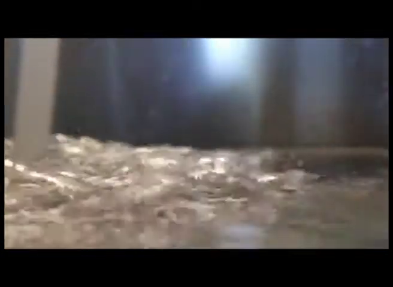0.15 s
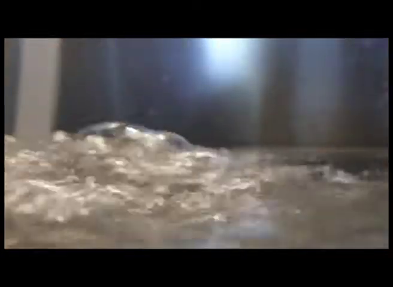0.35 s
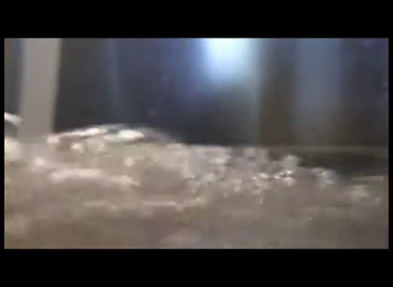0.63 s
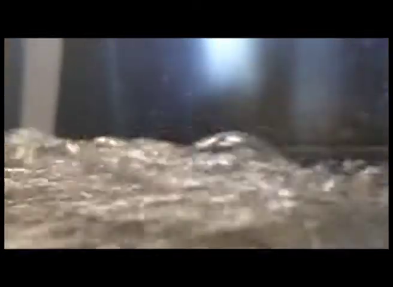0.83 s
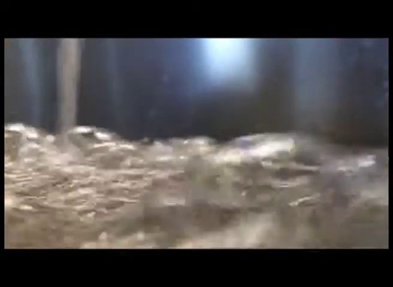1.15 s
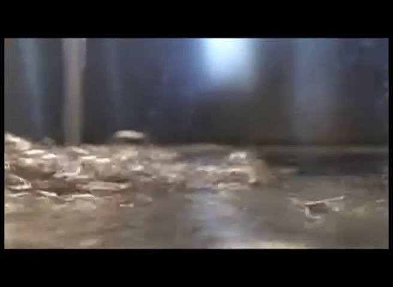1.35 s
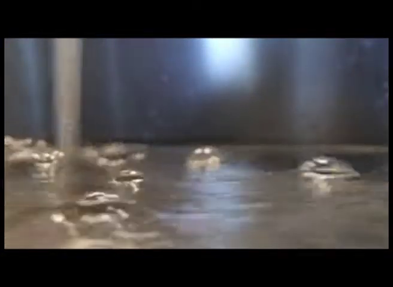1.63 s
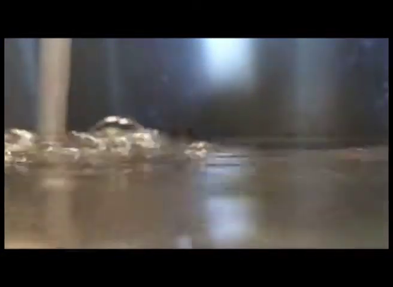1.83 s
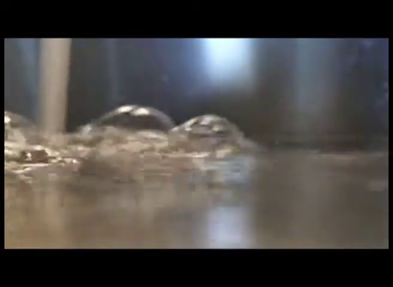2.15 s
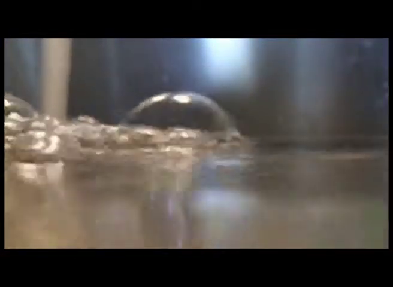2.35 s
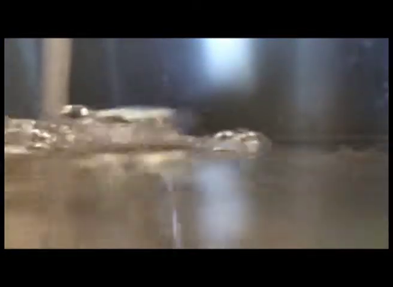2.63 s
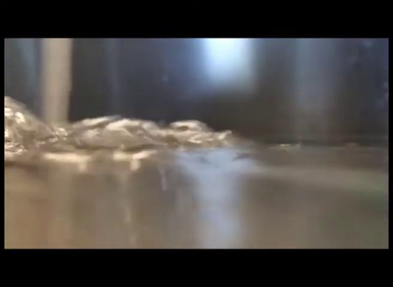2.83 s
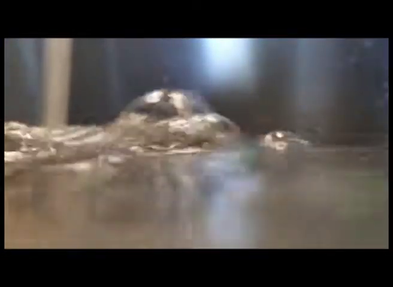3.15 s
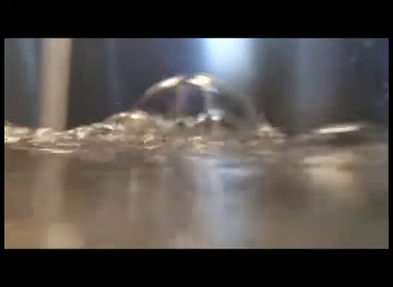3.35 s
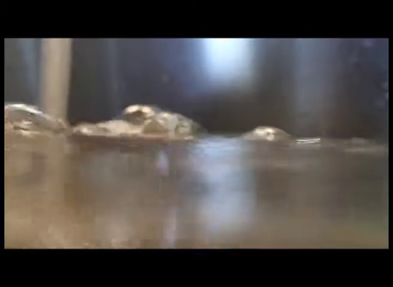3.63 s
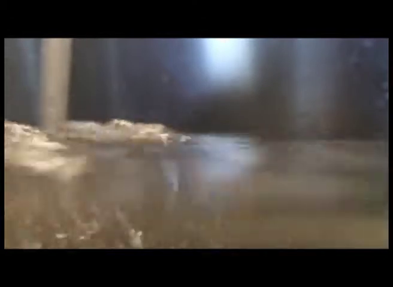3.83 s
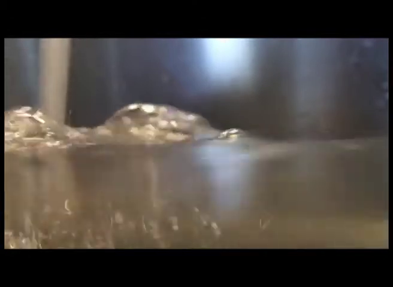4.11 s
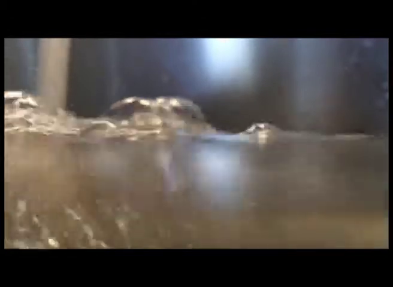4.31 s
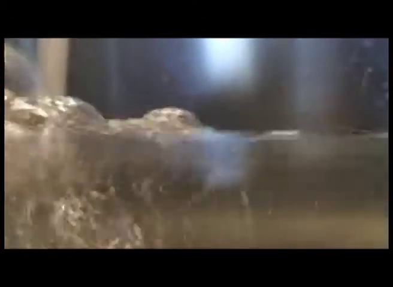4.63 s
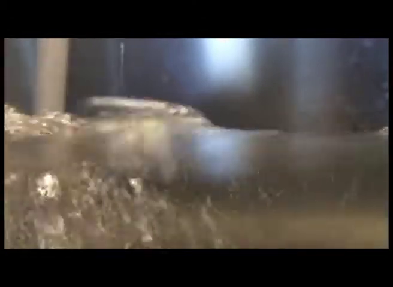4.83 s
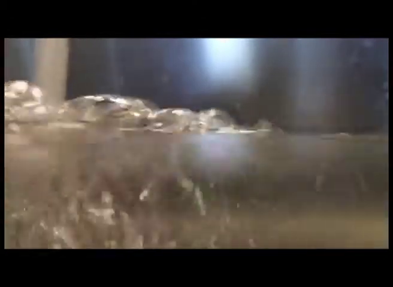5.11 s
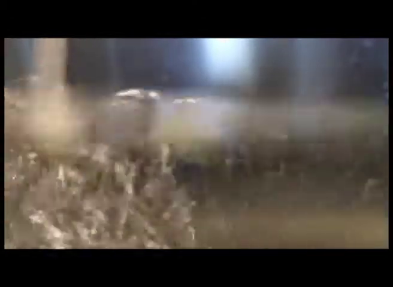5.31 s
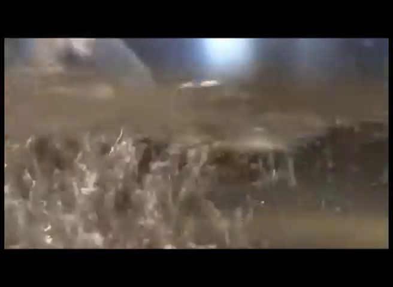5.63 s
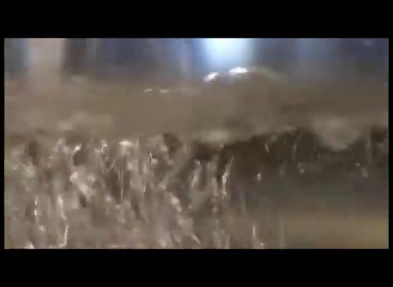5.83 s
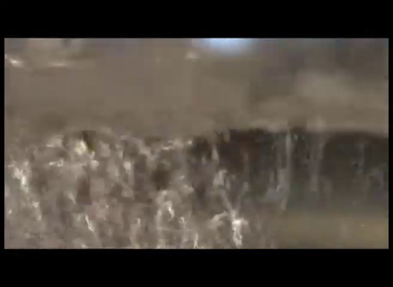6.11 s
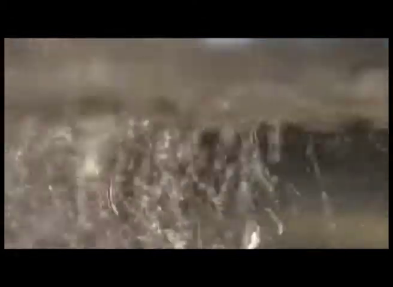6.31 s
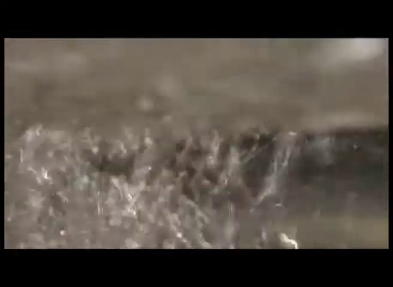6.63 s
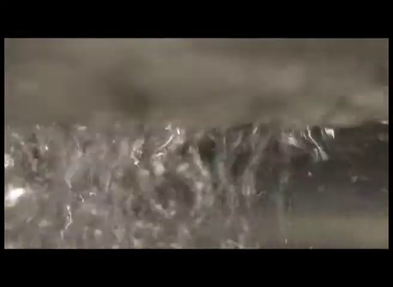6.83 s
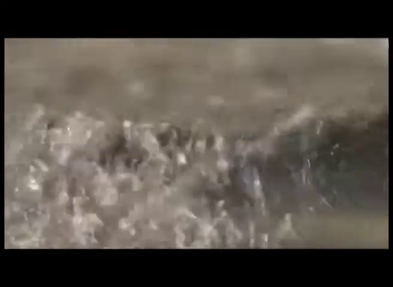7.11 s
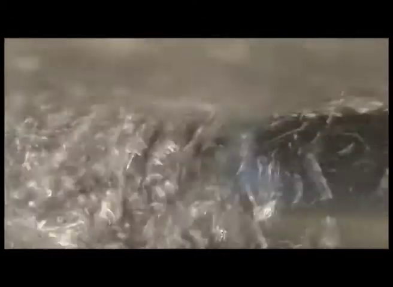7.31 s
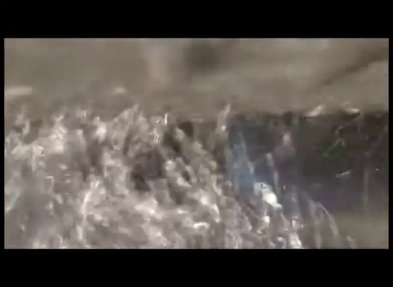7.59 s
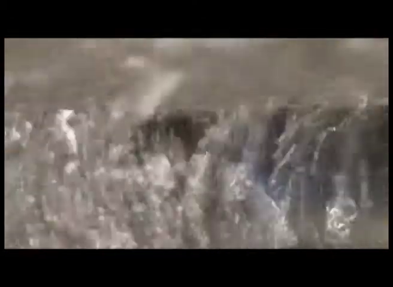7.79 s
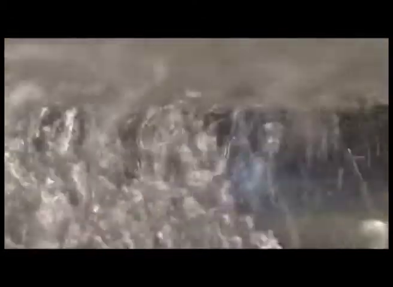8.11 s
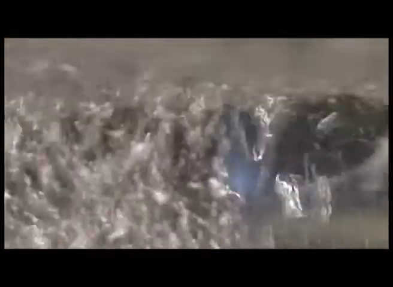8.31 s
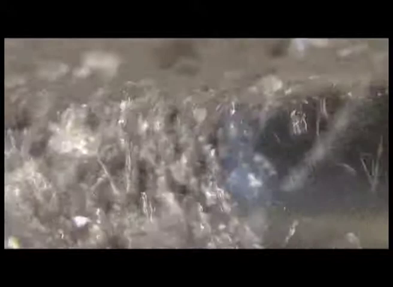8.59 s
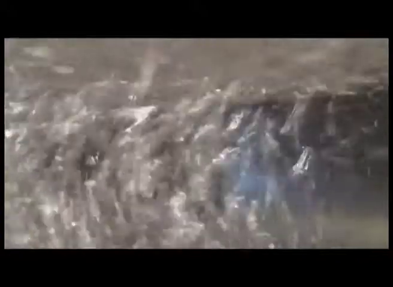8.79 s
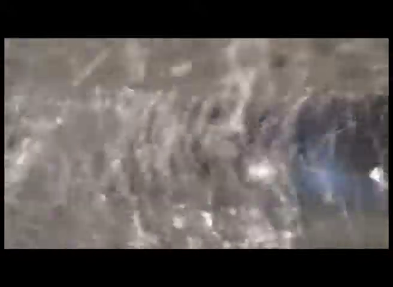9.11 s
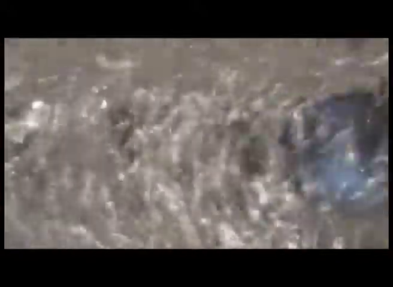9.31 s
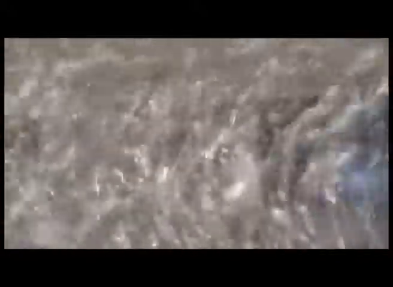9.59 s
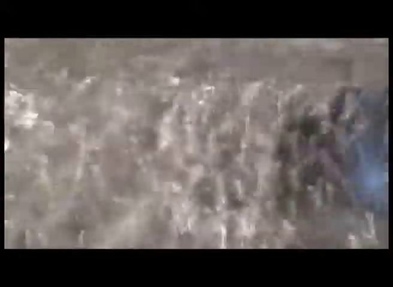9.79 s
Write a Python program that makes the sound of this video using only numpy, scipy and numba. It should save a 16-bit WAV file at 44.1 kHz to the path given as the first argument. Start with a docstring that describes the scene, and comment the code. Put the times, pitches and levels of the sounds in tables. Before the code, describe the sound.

A jet of tap water falls into a steel sink, heard very close. From 0 to 1 second it splashes and gurgles strongly, spray pattering and ringing on bare metal. As a pool forms the ring changes and the flow weakens; from about 1.3 to 1.7 seconds the gurgling thins to lighter trickling and drips. It returns with a gulp near 1.75, then pours steadily, with irregular bubbly gulps, ringing drops, snapping bubble pops, notably at 1.8, 2.7 and 4.1, and low plops. Around 5 to 6.3 the pour strengthens and a fine, high fizz draws near. At 6.36 a thump shuts off the open sound. Underwater, dull hollow burbling with low rumble and faint fizz surges and slackens rapidly. Small blips and, from 7 seconds, heavier bumps strike the housing, crowding between 8.4 and 9.6, and the churning continues to the end, near 10 seconds.

```python
"""Tap filling a steel sink until the microphone floods

A jet drags air under: bubbles gurgle, spray splashes, foam fizzes and the basin rings along.
Drips ring, surface bubbles pop and air pockets plop. The water then closes over the microphone with
a thump, and the churning is heard as a dull, surging burble through its flooded port.
Sources are clouds of rising, dying sines and noise, each coloured by a spectrum, plus timed single events."""
import sys
import numpy as np
from scipy import signal
from scipy.fft import rfft, irfft, next_fast_len
from scipy.io import wavfile
from scipy.ndimage import uniform_filter1d, minimum_filter1d
from numba import njit

SR = 44100
rng = np.random.default_rng(int(sys.argv[2]) if len(sys.argv) > 2 else 0)


def output_pcm(signal):
    """Save a mono or channel-first signal as 16-bit PCM at the path in sys.argv[1].

    Samples are clipped to [-1, 1] before scaling.
    """
    pcm = np.clip(np.atleast_2d(signal).T, -1, 1) * 32767
    wavfile.write(sys.argv[1], SR, np.round(pcm).astype(np.int16))


N = 438794
TIME = np.arange(N) / SR
FLOOD_S = 6.358   # water covers the microphone
PORT_HZ = 604   # resonance of the port as it floods


def from_db(db):
    """Decibels to gain."""
    return 10 ** (np.asarray(db) / 20)


def rms_one(x):
    """Scale to unit power."""
    return x / np.sqrt(np.mean(x ** 2) + 1e-20)


def drift(rate_hz):
    """Slow random wander of rms 1: noise through a two-pole low-pass, computed every 40 samples."""
    r = np.exp(-80 * np.pi * rate_hz / SR)
    noise = rng.standard_normal(N // 40 + 2002)
    slow = signal.lfilter([1], [1, -2 * r, r * r], noise)[2000:]   # start-up dropped
    return np.interp(np.arange(N) / 40, np.arange(len(slow)), rms_one(slow))


def spatters(per_s, decay_s, rise_s=0.00095):
    """Random clumps of drops or bubbles: each a quick rise and a slower fall; mean 0, rms 1."""
    landings = (rng.random(N) < per_s / SR) * rng.uniform(.3, 1, N)
    rise, fall = np.exp(-1 / (rise_s * SR)), np.exp(-1 / (decay_s * SR))
    clumps = signal.lfilter([1], np.poly([rise, rise, fall]), landings + 1e-18)
    return rms_one(clumps - clumps.mean())


def colour(x, spectrum):
    """Causal (minimum-phase) filter with the given spectrum; rms 1."""
    size = 2 * next_fast_len(N // 2 + SR // 8)
    hz, db = np.transpose(spectrum)
    grid_hz = np.maximum(np.arange(size // 2 + 1) * SR / size, 1)
    grid_db = np.interp(np.log(grid_hz), np.log(hz), db)
    cepstrum = irfft(np.log(from_db(grid_db)))
    # fold onto positive times: minimum phase
    cepstrum[1:size // 2] *= 2
    cepstrum[size // 2 + 1:] = 0
    return rms_one(irfft(rfft(x, size) * np.exp(rfft(cepstrum)))[:N])


def resonance(x, hz, width_hz):
    """Two-pole resonance, gain 1 on top."""
    r = np.exp(-np.pi * width_hz / SR)
    numerator = np.array([1, 0, -1]) * (1 - r * r) / 2
    denominator = [1, -2 * r * np.cos(2 * np.pi * hz / SR), r * r]
    return signal.lfilter(numerator, denominator, x + 1e-18)


def noise_band(count, hz, width_hz, second_width_hz):
    """Noise through two resonances in series."""
    once = resonance(rng.standard_normal(count), hz, width_hz)
    return resonance(once, hz, second_width_hz)


def play(events, sound):
    """Lay 0.25 s of sound(age, other columns) at each event's time and level."""
    out, age = np.zeros(N + SR), TIME[:SR // 4]
    for s, db, *rest in events:
        at = max(round(s * SR), 0)
        out[at:at + len(age)] += from_db(db) * sound(age, *rest)
    return out[:N]


def swell(age, peak_s):
    """A quick rise to 1 and a slower fall."""
    return age / peak_s * np.exp(1 - age / peak_s)


def knock(age, hz, decay_s):
    """A heavily damped sine: one push of pressure."""
    return np.sin(2 * np.pi * hz * age) * np.exp(-age / decay_s)


@njit
def ring_bubbles(starts, steps, sizes, cycles, rise, out):
    """Each bubble is a dying sine (-60 dB over its life) whose pitch rises as it nears the surface."""
    out = out.copy()
    for k in range(len(starts)):
        life = int(cycles[k] * 2 * np.pi / steps[k])
        height, loss = sizes[k], np.exp(-np.log(1000) / life)
        for i in range(min(life, len(out) - starts[k])):
            out[starts[k] + i] += height * np.sin(steps[k] * i * (1 + rise * i / life / 2))
            height *= loss
    return out


def bubbles(per_s, low_hz, high_hz, cycles, spread_db, wash, rise=0.16):
    """A spectrally flat cloud of bubbles, small ones commonest, on a wash of countless faint ones."""
    when, radius, force, damping, side = rng.random((int(per_s * N / SR), 5)).T
    hz = (np.sqrt(low_hz) + radius * (np.sqrt(high_hz) - np.sqrt(low_hz))) ** 2
    sizes = hz ** .75 * from_db(-spread_db * np.log(force + .02)) * np.sign(side - .5)
    starts, steps = (when * N).astype(np.int64), 2 * np.pi * hz / SR
    cloud = ring_bubbles(starts, steps, sizes, cycles * (.5 + damping), float(rise), np.zeros(N))
    bandwidth_share = (high_hz - low_hz) / (SR / 2)
    return rms_one(cloud) * np.sqrt(bandwidth_share) + wash * rng.standard_normal(N)


def basin_drum(force_db, lull, waver, clumps, gulp):
    """The basin shakes dully: low noise that follows the jet, with a jolt at each gulp."""
    # relative spectrum: f/Hz, level/dB
    drum_colour = [(25, -44), (45, -35), (65, -26), (88, -2.5), (108, 5.5), (150, -2), (220, 4.5),
                   (295, -7), (365, 5.5), (450, -7.5), (700, -27)]
    level_db = -42 + 1.1 * force_db - 6 * lull + 1.4 * waver + 0.9 * clumps
    return colour(rng.standard_normal(N), drum_colour) * (from_db(level_db) + from_db(-20) * gulp)


def basin_ringing(force_db, clumps):
    """Spray patters on the steel; a pool under the jet changes which modes it reaches."""
    # modes: f/Hz, width/Hz, relative level/dB on bare steel, same in a pool, gain per jet force/(dB/dB)
    modes = [(586, 69, -8, -12, 1.2), (1645, 41, 1, 3.5, 1), (2020, 103, -2, -10.5, 1),
             (2373, 33, 3.5, -0.5, 1), (2640, 28, -28, -11, -1), (3410, 53, -12, -8, 0.5),
             (4505, 39, -0.5, -2, 1.3), (6500, 68, -20, -6, -0.7), (6700, 39, -27, -17.5, -0.5)]
    pool_s, change_s = 0.99, 0.13
    pool = np.clip((TIME - pool_s) / change_s + .5, 0, 1)
    patter = rng.standard_normal(N) * from_db(1.63 * clumps)
    ringing = np.zeros(N)
    for hz, width_hz, bare_db, pool_db, follows in modes:
        gain = (1 - pool) * from_db(bare_db) + pool * from_db(pool_db)
        ringing += gain * from_db(follows * force_db) * resonance(patter, hz, width_hz)
    return rms_one(ringing) * from_db(-25)


def foam_fizz(force_db, clumps):
    """Tiny bubbles fizz; the finest stand out as the surface creeps up to the microphone."""
    # relative spectrum: f/Hz, level/dB
    fizz_colour = [(500, -70), (4000, -7), (6500, -2.5), (7800, -1.5), (9000, -2), (10500, -2),
                   (11300, -15), (12200, -57)]
    near_s, near_db = 0.67, 6.5
    foam = bubbles(per_s=3000, low_hz=4000, high_hz=12200, cycles=16, spread_db=-3.5, wash=1.0)
    nearness = np.exp(np.minimum(TIME - FLOOD_S, 0) / near_s)
    foam += from_db(9.5) * nearness * resonance(foam, hz=11370, width_hz=1000)
    flicker_db = 0.34 * clumps + 1.22 * spatters(per_s=58, decay_s=0.0058)
    return colour(foam, fizz_colour) * from_db(-36.5 + 0.87 * force_db + near_db * nearness + flicker_db)


def spray_splash(force_db, waver, clumps, gulp):
    """Spray rings many small, lightly damped bubbles; each gulp throws more."""
    # relative spectrum: f/Hz, level/dB
    splash_colour = [(100, -80), (800, -12), (1400, -4), (1900, -0.5), (2100, 1.5), (2230, -7), (2450, 1),
                     (3000, -2), (4400, 0), (5200, -4.5), (6500, -11.5), (8000, -22.5), (12000, -49)]
    spray = bubbles(per_s=1700, low_hz=910, high_hz=10015, cycles=68, spread_db=3.0, wash=1.0, rise=0.076)
    splash = colour(spray, splash_colour) * from_db(0.49 * waver + 0.96 * clumps)
    return splash * (from_db(-24.5 + 0.89 * force_db) + from_db(-10.5) * gulp)


def jet_gurgle(force_db, lull, waver, clumps, gulp):
    """Air dragged under by the jet rings as large bubbles, loudest in the gulps."""
    # relative spectrum: f/Hz, level/dB
    gurgle_colour = [(60, -54), (300, -27), (450, -11), (540, -4.5), (610, -10.5), (740, 3), (830, 1.5),
                     (1000, 1.5), (1300, -7), (1700, -7.5), (2600, -42)]
    cloud = bubbles(per_s=520, low_hz=303, high_hz=2593, cycles=22.6, spread_db=2.5, wash=0.79)
    level_db = -27.5 + 0.7 * force_db - 9.5 * lull + 0.8 * waver + 1.9 * clumps
    return colour(cloud, gurgle_colour) * (from_db(level_db) + gulp)


def pouring():
    """One wavering jet force drives drum, ringing, fizz, splash and gurgle together."""
    # jet force: t/s, level/dB
    jet = [(0.0, -22.5), (0.03, -19), (0.88, -19), (1.0, -25), (1.22, -26.5), (1.42, -30), (1.67, -27.5),
           (1.74, -21.5), (1.88, -24.5), (4.9, -23), (5.17, -21), (6.33, -20.4)]
    # largest gulps of air dragged under: t/s, relative peak/dB, time to peak/s
    gulps = [(0.76, -22, 0.0051), (0.9, -21, 0.0041), (1.04, -29, 0.0075), (1.13, -33, 0.012),
             (1.495, -30.5, 0.015), (1.745, -21.5, 0.015), (2.218, -17, 0.0042), (2.539, -28.5, 0.0061),
             (2.683, -20.5, 0.0028), (2.738, -26, 0.0041), (2.914, -26, 0.011), (3.019, -19, 0.0049),
             (3.233, -22.5, 0.0077), (3.36, -31, 0.0047), (3.491, -26, 0.004), (3.772, -27, 0.0086),
             (3.823, -19, .01), (4.041, -22.5, 0.0056), (4.317, -24.5, 0.0047), (4.542, -26, 0.0031),
             (5.295, -24.5, 0.0094), (5.711, -24, 0.0066), (6.251, -21, .007)]
    usual_jet_db = -24
    force_db = np.interp(TIME, *np.transpose(jet)) - usual_jet_db
    # the thinned jet slips in, dragging less air under
    lull_start_s, lull_end_s, fade_s, return_s = 1.26, 1.72, .09, .03
    lull = np.minimum((TIME - lull_start_s) / fade_s, (lull_end_s - TIME) / return_s)
    lull = np.clip(lull + .5, 0, 1)
    waver, clumps = drift(rate_hz=22), spatters(per_s=57, decay_s=0.0041)
    gulp = play(gulps, swell)
    basin = basin_drum(force_db, lull, waver, clumps, gulp) + basin_ringing(force_db, clumps)
    spray = foam_fizz(force_db, clumps) + spray_splash(force_db, waver, clumps, gulp)
    return basin + spray + jet_gurgle(force_db, lull, waver, clumps, gulp)


def plop(age, start_hz=520, end_hz=190, fall_s=0.00835, peak_s=0.0089):
    """A collapsing air pocket: a short tone that drops in pitch."""
    hz = end_hz + (start_hz - end_hz) * np.exp(-age / fall_s)
    return np.sin(2 * np.pi * np.cumsum(hz) / SR) * swell(age, peak_s)


def pop(age, hz):
    """A film tears with a sharp snap that scatters round the basin."""
    snap = 1.25 * knock(age, hz, decay_s=.0005) + .4 * knock(age, hz=2000, decay_s=.0006)
    scatter = rms_one(noise_band(len(age), hz, width_hz=3200, second_width_hz=3200))
    return snap + 0.28 * scatter * np.exp(-age / .005)


def drip(age, hz, decay_s, rise_per_s):
    """One trapped bubble: a short tone that bends upward."""
    tone = np.sin(2 * np.pi * hz * age * (1 + rise_per_s * age))
    return tone * np.exp(-age / decay_s) * (1 - np.exp(-age / 0.0003))


def falling_drop(age, hz):
    """A drop smacks the surface and the bubble that it traps rings."""
    smack = rms_one(noise_band(len(age), hz, width_hz=2000, second_width_hz=2000))
    return drip(age, hz, decay_s=0.0041, rise_per_s=2.5) + from_db(-8.0) * smack * np.exp(-age / 0.004)


def surface_events():
    """Single drops, bursting surface bubbles and collapsing air pockets."""
    # drops: t/s, relative level/dB, start f/Hz
    drips = [(1.243, -11.5, 1590), (1.506, -11.5, 4260), (1.532, -14.5, 4100), (1.623, -15.5, 1860),
             (1.671, -17, 2380), (1.734, -10, 1200), (1.783, -13, 3900), (2.554, -11, 2390),
             (2.595, -10.5, 3860), (2.648, -13, 3700), (3.019, -13, 1230), (3.198, -17, 3940),
             (3.257, -16, 2390), (3.456, -12.5, 2100), (3.915, -10, 3500), (4.38, -12.5, 4600),
             (4.554, -10, 4500), (4.669, -8, 1070), (5.077, -10.5, 4460), (5.236, -11, 3450),
             (5.396, -11, 2720), (5.522, -10, 2660), (6.025, -11.0, 2600), (6.171, -8, 2700)]
    # bursting bubbles: t/s, relative level/dB, f/Hz
    pops = [(1.357, -22, 10000), (1.8102, -9, 7100), (2.2059, -13, 6960), (2.6823, -7.5, 7920),
            (3.491, -22, 9400), (3.6351, -20, 7170), (4.1335, -5, 7140), (4.4722, -14, 9510),
            (5.3617, -19, 6910), (5.4006, -16, 6930), (5.464, -16, 9800)]
    # collapsing air pockets: t/s, relative level/dB
    plops = [(0.027, -23), (2.206, -28), (2.678, -36), (3.493, -19.5), (4.137, -23), (5.121, -36),
             (5.398, -16), (6.027, -20), (6.174, -19)]
    return from_db(1.0) * play(drips, falling_drop) + play(pops, pop) + from_db(-6.5) * play(plops, plop)


def thump(age, low_hz=200, decay_s=0.0011):
    """Water slaps the port shut: a suck of pressure against a heavily damped ring of the port."""
    return knock(age, PORT_HZ, decay_s) - 1.34 * knock(age, low_hz, decay_s)


def bump(age, hz):
    """A large bubble bursts on the housing: a dull push that drops in pitch, with a small crack."""
    crack = noise_band(len(age), hz=1200, width_hz=2300, second_width_hz=2100) * np.exp(-age / .003)
    return plop(age, start_hz=400, end_hz=hz, fall_s=0.0042, peak_s=0.0051) + from_db(-6) * crack


def blip(age, hz):
    """A small bubble on the housing: a rising tone with a tiny click."""
    return drip(age, hz, decay_s=0.0026, rise_per_s=6.5) + 0.31 * knock(age, hz, decay_s=0.00014)


def housing_hits():
    """Large bubbles bump and small ones blip against the microphone housing."""
    # large bubbles: t/s, relative level/dB, final f/Hz
    knocks = [(7.03, -19, 200), (7.945, -26, 110), (8.38, -23, 150), (8.47, -15, 170), (8.55, -16.5, 80),
              (8.825, -19, 190), (8.97, -17, 190), (9.012, -22, 130), (9.146, -15.5, 101),
              (9.203, -21, 150), (9.282, -19, 90), (9.5, -13.5, 190)]
    # small bubbles: t/s, relative level/dB, start f/Hz
    snaps = [(6.5462, -14, 1230), (6.6394, -21, 2010), (7.2594, -18, 1260), (7.3971, -24, 1420),
             (7.672, -20, 1350), (8.5425, -20, 1390), (8.56, -14, 1290), (9.0044, -23, 1650),
             (9.1494, -25, 1280), (9.398, -11, 1250), (9.42, -15, 1360), (9.5973, -11, 1530),
             (9.774, -22, 1270)]
    return play(knocks, bump) + from_db(2.0) * play(snaps, blip)


def sunk_fizz(sunk_s):
    """Fine bubbles heard through water; less treble gets in as it deepens."""
    # relative spectrum: f/Hz, level/dB
    fizz_colour = [(900, -24.5), (2000, 0), (2500, -6), (3000, -12), (4300, -15.5), (5200, -10.5),
                   (5800, 3), (6500, -10), (7300, -14.5), (9000, -16), (10500, -22.5), (12000, -40)]
    cloud = bubbles(per_s=3000, low_hz=1500, high_hz=12100, cycles=9.9, spread_db=7.0, wash=0.86)
    return colour(cloud, fizz_colour) * from_db(-38.5 - 1.15 * sunk_s)


def sunk_rumble(sunk_s):
    """Large, heavily damped bubbles rumble, louder as the water deepens."""
    # relative spectrum: f/Hz, level/dB
    rumble_colour = [(20, -23.5), (50, -20), (100, -5.5), (200, 1.5), (330, 1), (500, -2.5), (1000, -38),
                     (3000, -74)]
    cloud = bubbles(per_s=300, low_hz=25, high_hz=920, cycles=4.4, spread_db=3.5, wash=0.34)
    return colour(cloud, rumble_colour) * from_db(-31.5 + 0.95 * sunk_s)


def flooded_port(cloud, sunk_s):
    """The port rings with the bubbles; all of its colour sinks as the water deepens."""
    # relative spectrum: f/Hz, level/dB
    burble_colour = [(40, -50), (150, -26.5), (350, -9.5), (450, -8.5), (530, -2), (650, -2), (780, -6),
                     (910, -1), (1100, -16), (1400, -21), (1700, -22.5), (2200, -32.5), (3000, -42),
                     (10000, -82)]
    sag_hz_per_s = 14
    rung = colour(cloud + from_db(11.5) * resonance(cloud, PORT_HZ, width_hz=78), burble_colour)
    play_position = np.cumsum(1 - sag_hz_per_s / PORT_HZ * sunk_s)
    return np.interp(play_position, np.arange(N), rung)


def port_burble(sunk_s):
    """Bubbles ring the flooded port; evened out, so that surges more than single bubbles set the loudness."""
    cloud = bubbles(per_s=1100, low_hz=148.4, high_hz=4990, cycles=7.9, spread_db=1.0, wash=0.48)
    burble = flooded_port(cloud, sunk_s)
    power = uniform_filter1d(burble ** 2, size=900) + 1e-9
    return burble * from_db(-11 + 0.17 * sunk_s) / power ** 0.17


def surging():
    """Gain of the churning: mostly a slackening, then a cloud at once; smaller clouds come at random."""
    # strongest clouds sweeping past: t/s, relative push/dB, level change just before/dB
    surges = [(6.437, -6, -2), (6.542, -6, 2.5), (6.595, -6, 9), (6.705, -4, -3), (6.825, -8, -2.5),
              (6.925, -8, -1), (7.015, 0, -3), (7.1, 4, -6), (7.216, 3, -3.5), (7.351, -4, -1),
              (7.399, -3, -1.5), (7.461, -7, -3.5), (7.702, -3, -5), (7.815, 1, 2), (8.064, 0, -3),
              (8.139, -7, -7), (8.223, -13, -5), (8.293, -2, -2), (8.363, -8, -7), (8.46, 0, 3),
              (8.531, -11, -9), (8.744, -7, -2.5), (8.814, 5.5, -3), (8.96, -7, -2.5), (9.092, -10, -3),
              (9.135, 4, 0), (9.257, -7.5, -9), (9.29, 4, -2.5), (9.358, 0, -7.5), (9.421, -7, -3.5),
              (9.495, -1, -8.5), (9.591, -2, -7), (9.642, -1, -1), (9.703, -7, -3.5), (9.759, -13, 0),
              (9.841, -3, -5.5)]
    attack_s, decay_s, slack_s = .0009, 0.018, 0.03

    def arrive(age, lull_db):
        return (1 - np.exp(-age / attack_s)) * np.exp(-age / decay_s)

    def slacken(age, lull_db):
        return lull_db * np.clip(np.minimum(2 * age / slack_s, (slack_s - age) / attack_s), 0, 1)

    surge = play(surges, arrive)
    slack_db = play([(s - slack_s, 0, lull_db) for s, _, lull_db in surges], slacken)
    return (0.67 + 1.55 * surge) * from_db(2.1 * spatters(per_s=45, decay_s=0.012) + slack_db)


def under_water():
    """Bubble clouds surge past: fizz, rumble and the burble of the filling port, with hits on the housing."""
    sunk_s, push = np.maximum(TIME - FLOOD_S, 0), surging()
    fill_s = 0.088
    filled = np.clip(sunk_s / fill_s, 0, 1)
    wide = push ** 0.76 * sunk_rumble(sunk_s) + push ** 0.69 * sunk_fizz(sunk_s)
    return filled * push * port_burble(sunk_s) + (TIME > FLOOD_S) * wide + housing_hits()


def limiter(x, ceiling, release_db_per_s):
    """The gain ducks just ahead of any peak over the ceiling and then recovers."""
    over_db = 20 * np.log10(np.maximum(np.abs(x) / ceiling, 1))
    recovery_db = release_db_per_s * TIME
    gain_db = recovery_db - np.maximum.accumulate(over_db + recovery_db)
    return x * from_db(uniform_filter1d(minimum_filter1d(gain_db, size=61), size=61))


def scene():
    """Sound through the air, then through the water; both channels alike."""
    in_air = pouring() + surface_events()
    open_port = np.exp(-np.maximum(TIME - FLOOD_S, 0) / 0.0024)
    flood = play([(FLOOD_S, 1.5)], thump)
    sunk = limiter(under_water() + flood, ceiling=0.5, release_db_per_s=247.5)
    mono = open_port * in_air + sunk
    return np.array([mono, mono])


def record(dry):
    """Clip at full scale, then cut the top steeply."""
    low_pass = signal.ellip(10, .1, 90, 11900, fs=SR, output="sos")   # order, ripple/dB, stop/dB, edge/Hz
    return signal.sosfilt(low_pass, np.clip(dry, -1, 1))


dry = scene()
out = record(dry)
output_pcm(out)
```